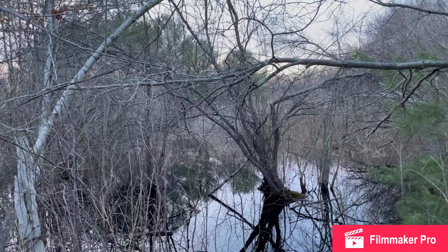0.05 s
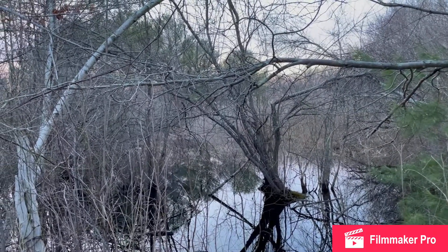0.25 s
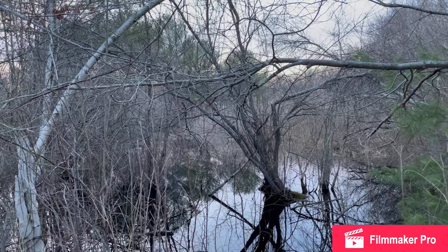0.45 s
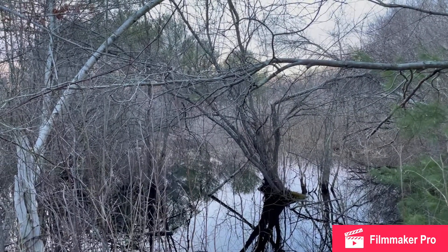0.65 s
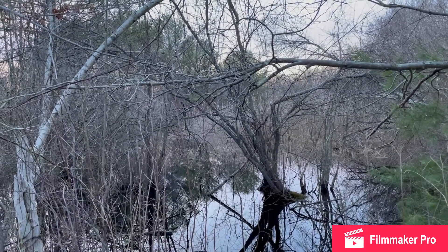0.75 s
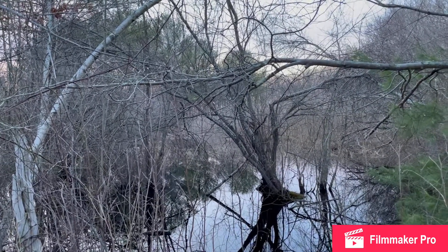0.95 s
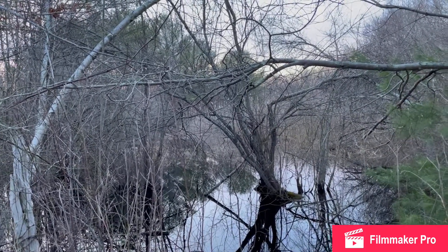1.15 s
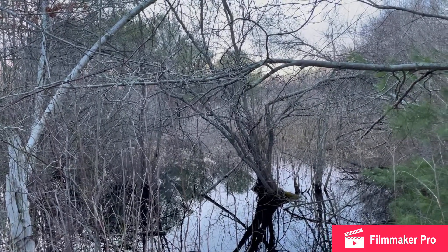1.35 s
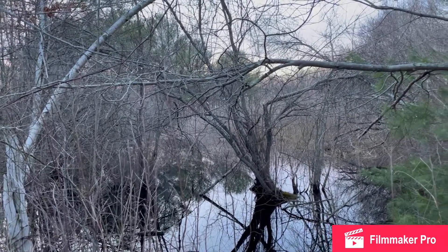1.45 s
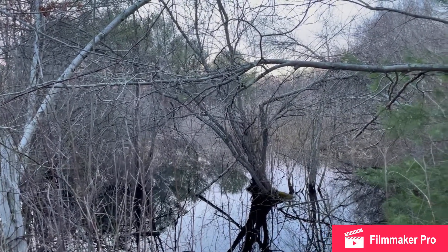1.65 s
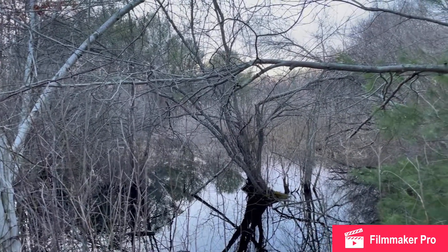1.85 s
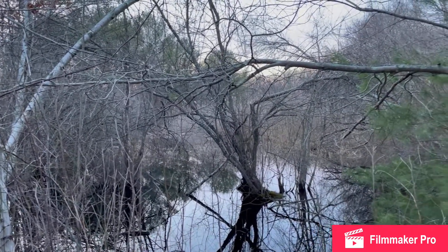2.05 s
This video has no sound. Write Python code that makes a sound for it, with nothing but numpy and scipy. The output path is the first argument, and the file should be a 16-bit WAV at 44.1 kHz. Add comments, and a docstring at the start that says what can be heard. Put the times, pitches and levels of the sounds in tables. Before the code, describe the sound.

Small tree frogs at a woodland pond give high rising peeps, with one early trill and a louder one at mid-point, over a blurred far chorus; faint birds chip, and a hand-held microphone rubs and thumps low.

```python
"""Spring peepers call around a woodland pond: rising single peeps, a few of them faint and far, and two trills.
Frog voices are weighted harmonics on gliding pitches, over a blur of distant frogs; a few birds chip and whistle.
Decaying noise stands for the trees that scatter every call; faint rustles are short bands of noise.
Under it lie a distant rumble of coloured noise and the low rubs and bumps of the hand-held microphone."""
import sys
import numpy as np
from scipy import signal
from scipy.fft import rfft, irfft, next_fast_len
from scipy.io import wavfile
from scipy.ndimage import map_coordinates

SR = 44100
rng = np.random.default_rng(int(sys.argv[2]) if len(sys.argv) > 2 else 0)


def store_pcm(level_fs):
    """Save levels as 16-bit WAV."""
    pcm = np.round(np.clip(level_fs, -1, 1) * 32767).astype(np.int16)
    wavfile.write(sys.argv[1], SR, np.atleast_2d(pcm).T)


N = 92610

# Frog calls: attack and release times, and the exponent of the pitch rise in a peep.
PEEP_ATTACK_S, PEEP_RELEASE_S, PEEP_BEND = .014, .005, .78


def amp(db):
    """Level in decibels is 20 times the logarithm of amplitude, inverted here."""
    return 10 ** (np.asarray(db) / 20)


def unit(x):
    """Root-mean-square normalisation gives signals equal mean power."""
    return x / np.sqrt(np.mean(x ** 2) + 1e-20)


def clock(start=0):
    """Uniform sampling: seconds since start, for every sample."""
    return np.arange(N) / SR - start


def wobble(rate):
    """Band-limited fluctuation: random knots, rate of them a second, joined by a smooth curve."""
    knots = rng.standard_normal(2000)
    return map_coordinates(knots, [np.arange(N) * rate / SR], mode='wrap')


def filtered(x, response):
    """Linear filtering: the spectrum is multiplied by a response of frequency."""
    m = next_fast_len(N + SR // 2)
    return irfft(rfft(x, m) * response(np.fft.rfftfreq(m, 1 / SR)), m)[..., :N]


def colour_gain(spectrum):
    """Spectral envelope: the response interpolates decibels over log frequency."""
    f, db = np.transpose(spectrum)
    return lambda hz: amp(np.interp(np.log(hz + 1), np.log(f), db))


def level_curve(table, trim_db=0):
    """Amplitude envelope: decibels run in straight lines between the table's times."""
    return amp(np.interp(clock(), *np.transpose(table)) + trim_db)


def noise_pair(alike, size):
    """Interchannel correlation: two independent noises mix to a left and right of given likeness."""
    a, b = rng.standard_normal((2, size))
    u = np.arccos(np.clip(alike, -1, 1)) / 2
    common, opposed = np.cos(u) * a, np.sin(u) * b
    return np.array([common + opposed, common - opposed])


def rush(spectrum, alike):
    """Coloured noise: a stereo white noise is shaped by a spectrum and set to rms 1."""
    return unit(filtered(noise_pair(alike, N), colour_gain(spectrum)))


def gate(t, length, attack, release):
    """Amplitude envelope: sine-shaped attack and release, the release centred on the length."""
    rise = np.clip(t / attack, 0, 1)
    fall = np.clip((length - t) / release + .5, 0, 1)
    return np.sin(np.pi / 2 * rise) * np.sin(np.pi / 2 * fall)


def glide(t, length, first_hz, last_hz, bend):
    """Power-law glide: pitch moves fastest at the start when bend is under 1."""
    return first_hz + (last_hz - first_hz) * np.clip(t / length, 0, 1) ** bend


def tone(hz):
    """Phase is the integral of frequency: a sine of rms 1 follows a pitch curve."""
    cycles = np.cumsum(hz) / SR + rng.random()
    return np.sqrt(2) * np.sin(2 * np.pi * cycles)


def panned(x, pan_db):
    """Interaural level difference: left over right in dB places a voice at constant mean power."""
    return unit(amp(np.array([[pan_db], [-pan_db]]) / 2)) * x


def frog_voice(hz, under_db, overtones_db):
    """The sac radiates the second harmonic of the larynx; the first, third and fourth leak out weakly."""
    hz = hz * (1 + .002 * wobble(150))
    # dB against the second harmonic
    levels = [under_db, 0, -22 + overtones_db, -32.5 + overtones_db]
    return sum(amp(db) * tone(hz * k / 2) for k, db in enumerate(levels, 1))


def swell(t, length, end_db, rise_db):
    """Crescendo: level in dB climbs linearly by rise_db to reach end_db at the end of a call."""
    return end_db + rise_db * (np.clip(t / length, 0, 1) - 1)


def peeps():
    """Frequency and amplitude modulation: each peep slides up, swells and flutters until it stops."""
    # Single peeps, from near frogs and a few faint far ones.
    # Each row: start in seconds, length in seconds, first and last pitch in Hz,
    # end level in dB before flutter, left over right in dB, undertone against the main harmonic in dB,
    # change of the overtones in dB, flutter depth in dB (the sign only inverts it).
    calls = [(0, .065, 3046, 3260, -45, -2, -36, -3, 2.5), (0.098, .15, 2779, 3320, -47, 0, -13, 1, 3.5),
             (0.351, .075, 2587, 2660, -57.5, 0, -25.5, -3.5, 3),
             (0.559, .175, 2788, 3328, -41, -4.5, -26.5, -1.5, 3),
             (0.609, .085, 2732, 3028, -40.5, -1.5, -30.5, 2, 1.5),
             (.785, 0.1, 2620, 2768, -44, -7.5, -30, -8, 0),
             (.855, .105, 2736, 3057, -38, -7.5, -32.5, -2, 3),
             (1.338, .18, 2761, 3295, -40, -2, -29.5, -4.5, 4),
             (1.498, .122, 2700, 3086, -39, 1.5, -37, -4.5, -0.5),
             (1.57, .155, 2670, 3102, -41.5, -5.5, -31, -3.5, -2),
             (1.68, .11, 2478, 2725, -50, 1.5, -25, -1, 9),
             (1.81, .08, 2610, 2710, -50.5, -1, -24, -4, 4.5),
             (1.906, 0.048, 3040, 3250, -55.5, -2, -27.5, -8, 8),
             (1.91, 0.042, 2775, 2864, -45.5, 2.5, -28, -5, -0.5),
             (1.956, .15, 2694, 3043, -43, -5.5, -33, -7.5, 1)]
    out = np.zeros((2, N))
    for s, length, first_hz, last_hz, db, pan_db, under_db, overtones_db, flutter_db in calls:
        t = clock(s)
        level = amp(swell(t, length, db, 3.5) + flutter_db * np.tanh(wobble(130)))
        hz = glide(t, length, first_hz, last_hz, PEEP_BEND)
        voice = frog_voice(hz, under_db, overtones_db)
        out += panned(voice * level * gate(t, length, PEEP_ATTACK_S, PEEP_RELEASE_S), pan_db)
    return out


def whistles():
    """Nearly pure tones make the bird notes; two harmonics of an arching pitch make one squeak."""
    # Each row: start in seconds, length in seconds, first and last pitch in Hz, level in dB,
    # left over right in dB.
    notes = [(0, .13, 4340, 4030, -49, -3), (.12, .09, 4030, 3880, -59, -3),
             (.775, .065, 1130, 1120, -56, -2), (.875, .045, 1260, 1255, -60, 0),
             (.93, .10, 1565, 1575, -51, 4), (.965, .105, 2490, 2520, -52.5, 2),
             (1.248, .03, 2150, 1950, -61, 0), (1.685, .05, 1060, 1040, -62, 0)]
    # Each row: start in seconds, length in seconds, foot and top of the silent fundamental in Hz,
    # level of the third harmonic in dB.
    squeak_rows = [(1.236, .026, 1130, 1470, -61)]
    fade_s, bend = .025, .55
    out = np.zeros((2, N))
    for s, length, first_hz, last_hz, db, pan_db in notes:
        t = clock(s)
        voice = tone(glide(t, length, first_hz, last_hz, bend) * (1 + .001 * wobble(120)))
        out += panned(amp(db) * voice * gate(t, length, fade_s, fade_s), pan_db)
    s, length, foot_hz, top_hz, db = squeak_rows[0]
    t = clock(s)
    hz = foot_hz + (top_hz - foot_hz) * np.sin(np.pi * np.clip(t / length, 0, 1))
    squeak = tone(3 * hz) + .5 * tone(4 * hz)
    return out + amp(db) * squeak * gate(t, length, .004, .0037)


def woods(x):
    """Scattering as convolution: near trunks answer at once, the far wood with a long tail."""
    t60_s, build_s, trunks_s = .87, .014, .03
    wood_db, trunks_db, alike = -8, -10, .6
    t = np.arange(SR) / SR
    tail = noise_pair(alike, SR) * amp(-60 * t / t60_s) * (1 - np.exp(-t / build_s))
    trunks = noise_pair(alike, SR) * np.exp(-t / trunks_s)
    answer = (amp(wood_db) * unit(tail) + amp(trunks_db) * unit(trunks)) / np.sqrt(SR)
    return x + signal.fftconvolve(x, answer, axes=1)[:, :N]


def far_chorus():
    """Superposition of many sources: far frogs peep at random, the farthest blur into a shimmering band."""
    # Each row: time in seconds, level of the far chorus in dB before the two layer levels.
    chorus = [(0.0, -55), (0.43, -48.5), (0.81, -46.5), (1.07, -49), (1.19, -56), (1.39, -48),
              (1.54, -44.5), (1.77, -50.5), (2.1, -55)]
    # Colour of the blur. Each row: frequency in Hz, relative level in dB.
    far_frogs = [(2000, -42), (2500, -11.5), (2750, -4.5), (2950, -3.5), (3220, -7), (3450, -11),
                 (4400, -35.5), (5200, -43.5), (7000, -75)]
    count, length, centre_hz, rise_hz = 40, .1303, 2693, 375.1
    blur_db, peep_db, pan_db = -9, -5, -2.5
    calls = np.zeros((2, N))
    for k, (when, pitch, loud, side) in enumerate(rng.uniform(-1, 1, (count, 4))):
        # evenly spaced starts, each shifted by up to one spacing
        t = clock((k + when) / count * N / SR - length / 2)
        hz = centre_hz * (1 + .06 * pitch)
        call = tone(glide(t, length, hz, hz + rise_hz, PEEP_BEND)) * gate(t, length, .01, .041)
        calls += panned(amp(1.4 * loud) * call, 5 * side)
    blur = amp(blur_db + 4.4 * wobble(7.2)) * rush(far_frogs, alike=.75)
    chorus_mix = blur + amp(peep_db) * unit(woods(calls))
    return panned(level_curve(chorus) * chorus_mix, pan_db)


def outdoor_air():
    """A diffuse field has little correlation between the ears: distant rumble, rustle and a treble hiss."""
    # Colour of the air's mid signal. Each row: frequency in Hz, relative level in dB.
    air = [(25, -16.5), (70, -3.5), (200, 4), (350, 0.5), (650, 1), (1000, -3.5), (1400, -11), (2200, -13),
           (3400, -12), (4500, -33.5), (5400, -37.5), (6700, -38.5), (7600, -58.5), (10500, -47.5),
           (14000, -57)]
    # Width of the air. Each row: frequency in Hz, side over mid in dB.
    air_side = [(40, -13.5), (200, -4), (400, -1), (650, 5), (1100, 5), (2000, 0.5), (5000, 3.5)]
    # Each row: time in seconds, level of the treble hiss in dB before its trim.
    treble = [(0, -72), (.15, -89.5), (0.331, -92), (.41, -68), (0.601, -66.5), (1.021, -70), (1.55, -73),
              (1.8, -65.5), (1.999, -74), (2.1, -91)]
    # Each row: frequency in Hz, relative level of the hiss in dB.
    treble_colour = [(1200, -27.5), (1900, -0.5), (3700, 4.5), (4700, 1.5), (5400, -6), (6600, -12.5),
                     (7500, -44), (11000, -29), (13000, -44.5)]
    mid, side = rush(air, alike=0)
    side = filtered(side, colour_gain(air_side))
    hiss = level_curve(treble, trim_db=9.5) * rush(treble_colour, alike=.3)
    wide = unit(np.array([mid + side, mid - side]))
    return amp(-49.5 + .5 * wobble(5.6)) * wide + hiss


def handling():
    """A damped resonator struck by pulses: the hand rubs and bumps the recorder, whose case rings low."""
    # Each row: time in seconds, level of the deep handling rumble in dB before its trim.
    rumble = [(0.0, -47), (0.17, -53), (0.2, -38.5), (0.24, -59), (0.27, -42), (0.48, -37), (0.56, -33.5),
              (0.6, -32.5), (0.66, -35), (0.7, -42.5), (0.79, -30), (0.87, -60.5), (0.9, -38),
              (0.95, -57.5), (1.02, -38), (1.13, -56.5), (1.29, -54.5), (1.39, -42), (1.47, -47.5),
              (1.84, -44), (1.85, -52), (2.1, -49)]
    # Each row: frequency in Hz, relative level of the rumble in dB.
    rumble_colour = [(20, -31.5), (38, -15.5), (60, -2), (85, -5.5), (130, -14), (250, -49.5), (600, -87.5)]
    # Each row: time in seconds, level of the lighter rubbing in dB before its trim.
    rub = [(0.0, -47.5), (0.33, -52), (0.48, -33.5), (0.54, -32), (0.6, -48.5), (0.68, -50.5), (0.76, -44),
           (0.91, -45), (0.96, -54.5), (1.02, -39), (1.09, -55), (1.3, -61.5), (1.37, -39), (1.4, -46),
           (1.54, -49), (1.55, -40), (1.63, -54.5), (1.67, -41), (1.69, -49.5), (2.1, -54)]
    # Each row: frequency in Hz, relative level of the rubbing in dB.
    rub_colour = [(50, -27), (110, 0.5), (190, -6.5), (320, -22), (600, -47.5), (1500, -84)]
    # Each row: centre of the bump in seconds, peak level in dB, width of the driving pulse in seconds.
    bumps = [(0.409, -26.5, 0.001), (.459, -25, .0012), (0.469, -31, 0.00074), (0.498, -18, 0.001),
             (0.544, -17, 0.0014), (0.564, -23.5, 0.0048), (.652, -26.5, 0.0031), (0.788, -26.5, 0.0016),
             (1.017, -31, 0.0011), (1.370, -29, 0.00045), (1.488, -33, 0.00056), (1.562, -34, 0.00082),
             (1.819, -32, 0.0031)]
    case_hz, case_width_hz = 70, 38
    lead_rad = .55  # phase lead of the left port, reached at 20 Hz

    def case(f):
        """Resonance: a band-pass with its peak at the case's natural frequency."""
        damping = 1j * f * case_width_hz
        return damping / (case_hz ** 2 - f ** 2 + damping)

    def port_phase(hz):
        """Interchannel phase: the left port runs ahead of the right."""
        return np.exp(.5j * lead_rad * np.minimum(hz / 20, 1) * np.array([[1], [-1]]))

    out = level_curve(rumble, trim_db=-.5) * rush(rumble_colour, alike=.97)
    out += level_curve(rub, trim_db=-1.5) * rush(rub_colour, alike=1.0)
    for s, db, width in bumps:
        u = clock(s) / width
        bump = filtered(u * np.exp(-u ** 2 / 2), case)
        out += amp(db) * bump / np.abs(bump).max()
    return filtered(out, port_phase)


def rustles():
    """Band-limited noise bursts: short, faint ticks and rustles."""
    # Each row: start in seconds, length in seconds, centre in Hz, width in octaves, level in dB.
    ticks = [(.002, .012, 3700, .06, -47.5), (0.239, 0.0081, 1850, .15, -56.5),
             (0.273, .05, 2250, .15, -61), (1.254, .014, 3300, .35, -57), (1.294, 0.0083, 4900, .12, -61),
             (1.697, .21, 1650, 0.093, -64.5)]
    out = np.zeros((2, N))
    for s, length, centre_hz, octaves, db in ticks:
        def bell(hz):
            return np.exp(-.5 * (np.log2((hz + 1) / centre_hz) / octaves) ** 2)

        band = filtered(noise_pair(.89, N), bell)
        out += amp(db) * unit(band) * gate(clock(s), length, length / 2, length / 2)
    return out


def trills():
    """Amplitude modulation: a longer rising call is chopped into quick pulses."""
    # Each row: start in seconds, length in seconds, pulses per second, first and last pitch in Hz,
    # end level in dB, swell in dB, left over right in dB.
    calls = [(0.167, .345, 31, 2682, 3128, -42, 5, -7), (0.964, .262, 34.5, 2907, 3360, -36, 10, 0.5)]
    sharpness, under_db, overtones_db = 2.9, -21, -2
    out = np.zeros((2, N))
    for s, length, rate, first_hz, last_hz, db, swell_db, pan_db in calls:
        t = clock(s)
        pulses = np.abs(np.sin(np.pi * rate * t)) ** (2 * sharpness)
        level = amp(swell(t, length, db, swell_db)) * gate(t, length, PEEP_ATTACK_S, PEEP_RELEASE_S)
        voice = frog_voice(glide(t, length, first_hz, last_hz, 1), under_db, overtones_db)
        out += panned(voice * pulses * level, pan_db)
    return out


def chips():
    """Two independent sources in one bird: one sweeps up high, the lower one holds and then drops."""
    # Each row: start in seconds, level in dB, pitch of the lower voice in Hz,
    # level of its closing drop in dB against the hold.
    calls = [(0.354, -55.5, 4250, -1.5), (.577, -61.5, 3980, -18.5), (0.83, -56, 4400, -0.5),
             (1.413, -56, 4290, 1.5), (1.616, -55, 3920, -14)]
    from_hz, to_hz, sweep_s, sweep_length_s, sweep_db = 4500, 7375, .015, .03, -10.5
    delay_s, hold_s, drop_s, fall_hz = .014, .048, .014, 800
    out = np.zeros((2, N))
    for s, db, hz, drop_db in calls:
        t = clock(s)
        sweep = tone(to_hz + (from_hz - to_hz) * np.exp(-np.maximum(t, 0) / sweep_s))
        sweep *= amp(sweep_db) * gate(t, sweep_length_s, .004, .03)
        t = t - delay_s
        drop = np.clip((t - hold_s) / drop_s, 0, 1)
        lower = tone(hz - fall_hz * drop + 55 * wobble(140))
        lower *= amp(drop_db * drop + 3.2 * wobble(140)) * gate(t, hold_s + drop_s, .012, .008)
        out += amp(db) * (panned(sweep, -2) + panned(lower, -6))
    return out


def frog_arrival(hz):
    """Interchannel delay is phase in proportion to frequency: the right port hears the frogs first."""
    lead_s = .00003
    return np.exp(-1j * np.pi * hz * lead_s * np.array([[1], [-1]]))


def scene():
    """Superposition: frogs and birds among the trees, over the far chorus and the low noises."""
    frogs = filtered(peeps() + trills(), frog_arrival)
    among_trees = woods(frogs + chips() + whistles() + rustles())
    return among_trees + far_chorus() + outdoor_air() + handling()


def record(dry):
    """Band limitation: the recorder keeps nothing above 13200 Hz."""
    return filtered(dry, lambda hz: hz < 13200)


dry = scene()
out = record(dry)
store_pcm(out)
```